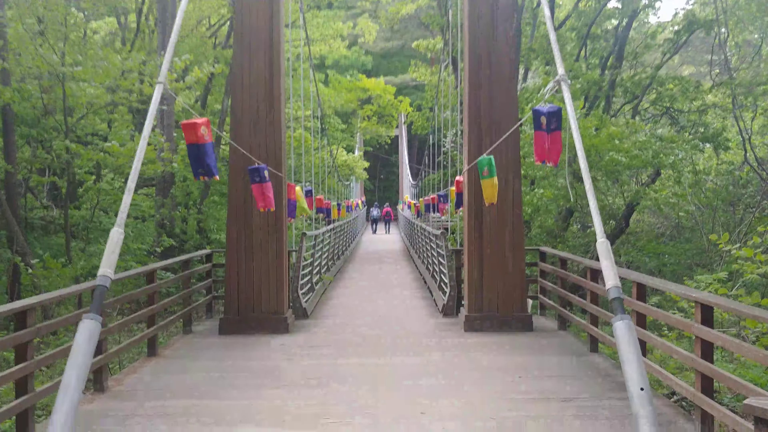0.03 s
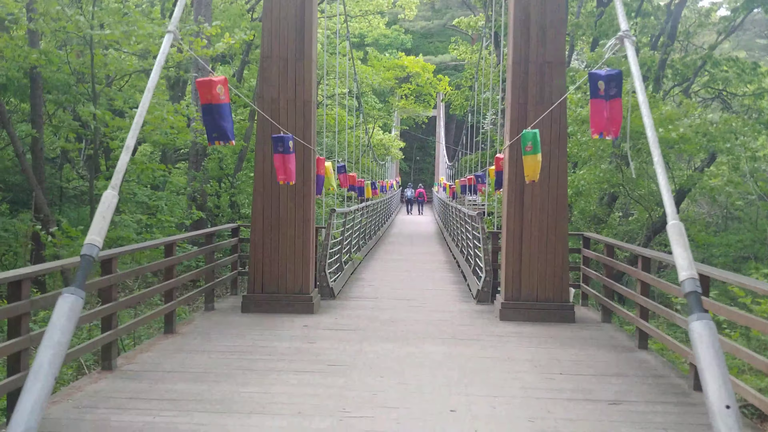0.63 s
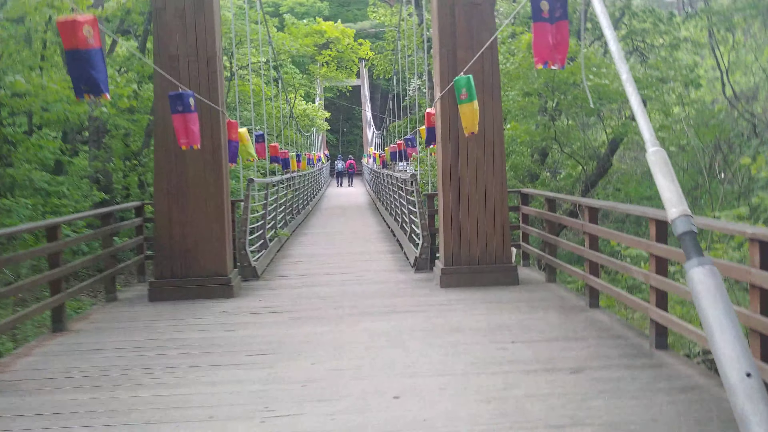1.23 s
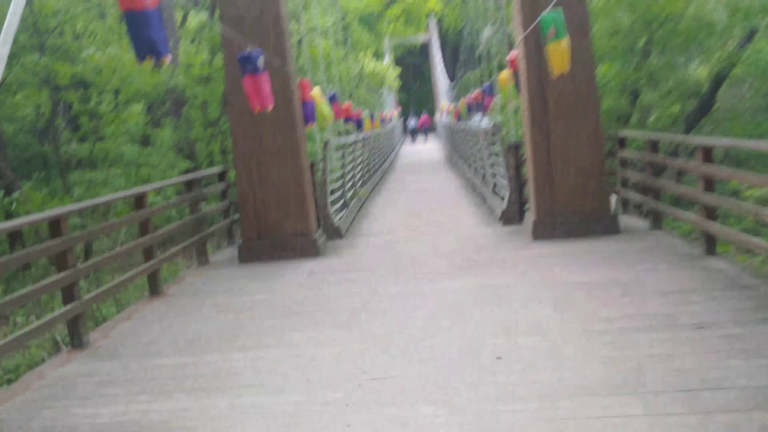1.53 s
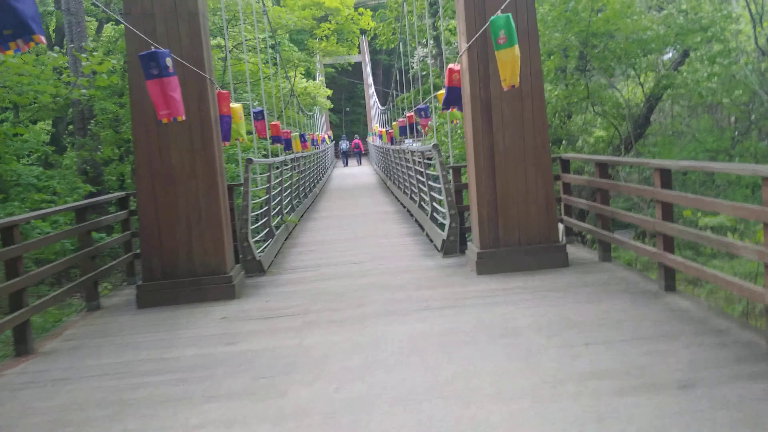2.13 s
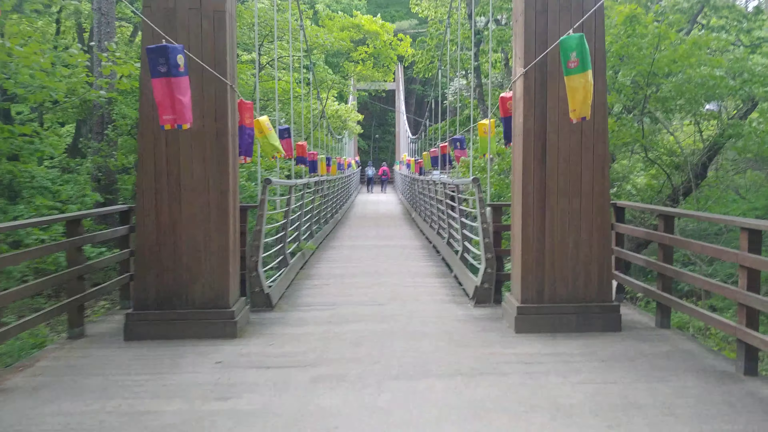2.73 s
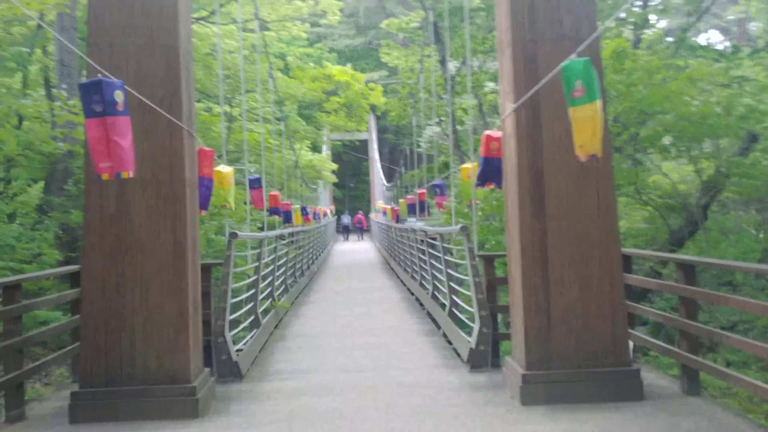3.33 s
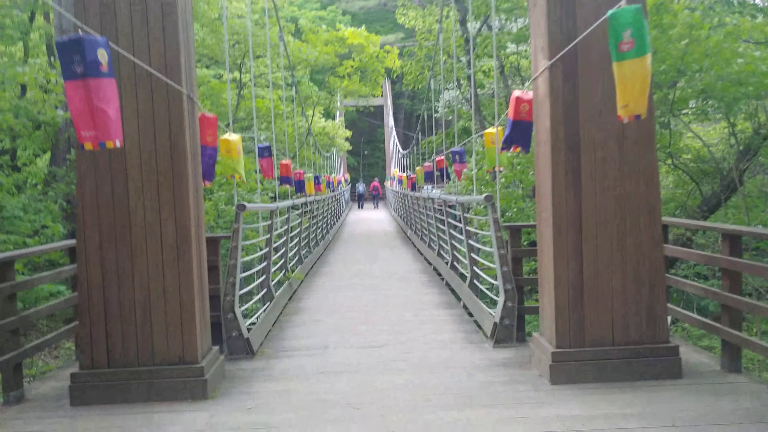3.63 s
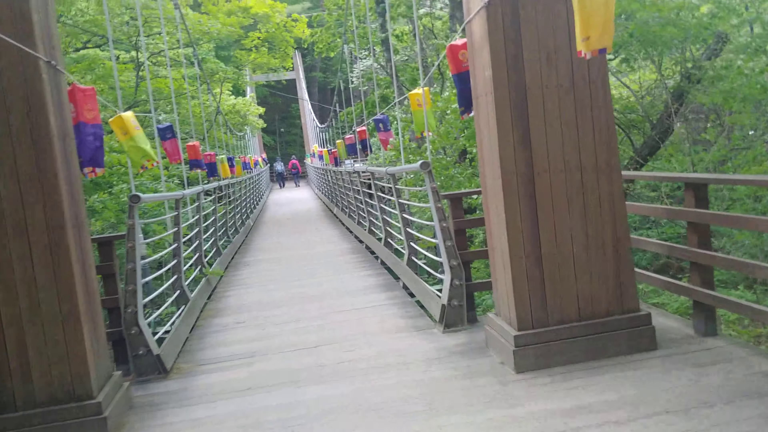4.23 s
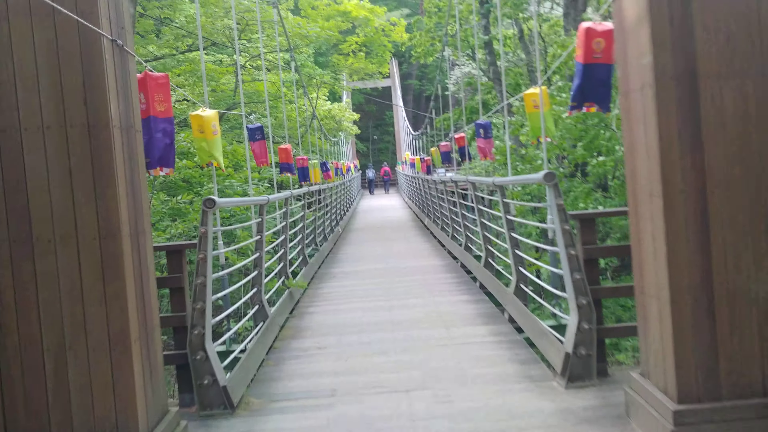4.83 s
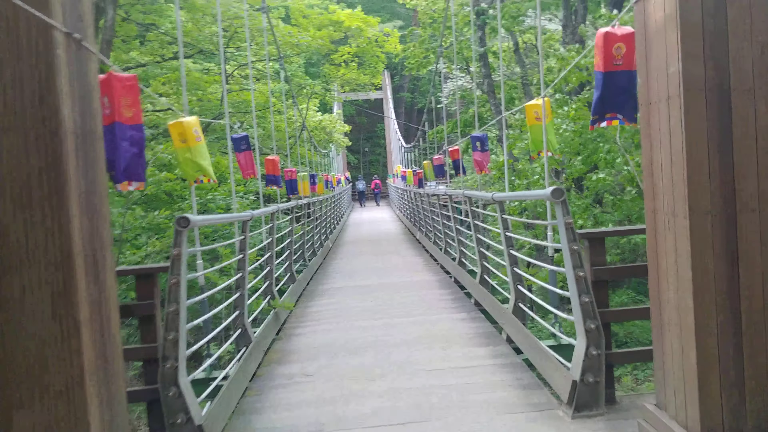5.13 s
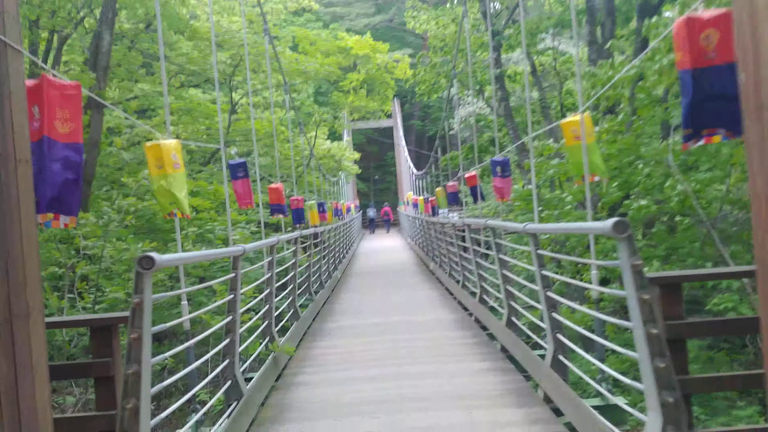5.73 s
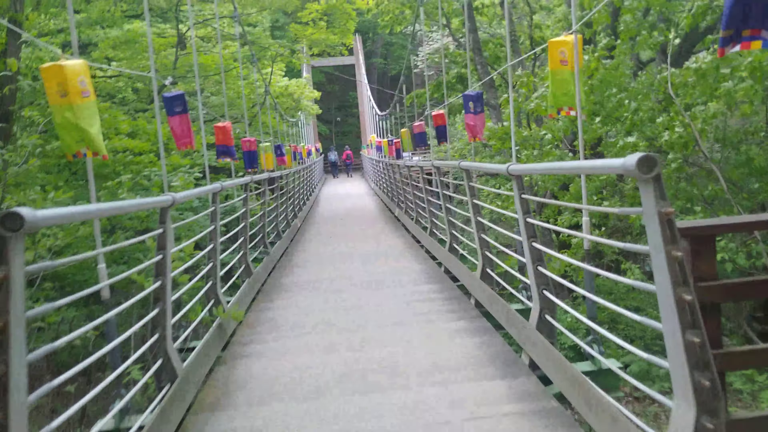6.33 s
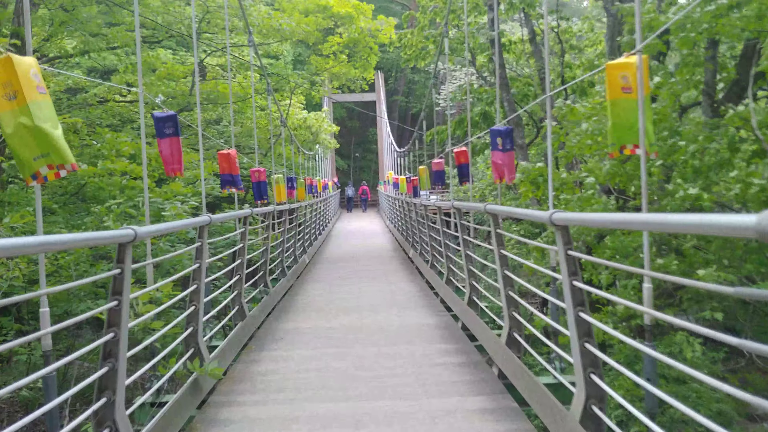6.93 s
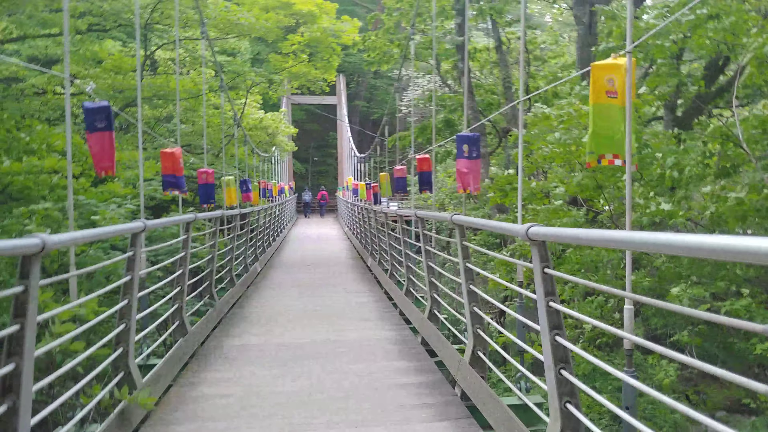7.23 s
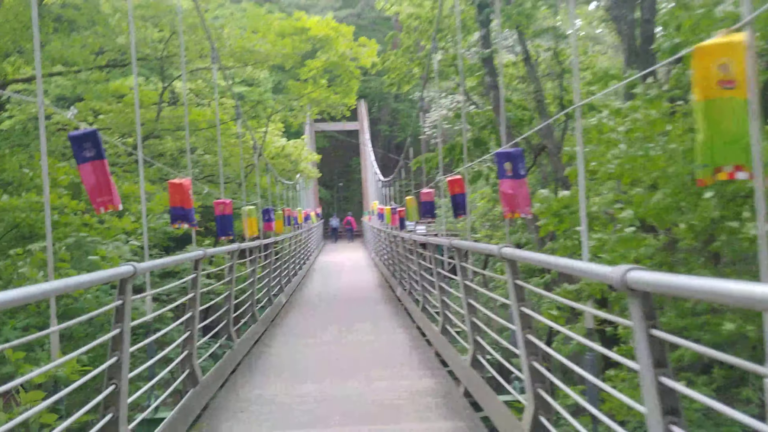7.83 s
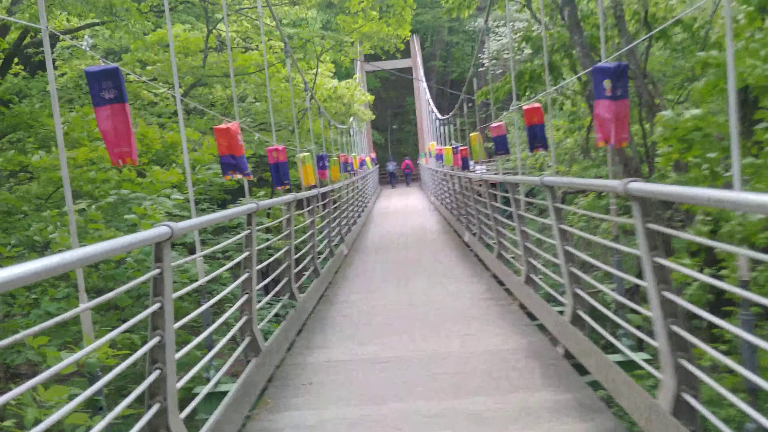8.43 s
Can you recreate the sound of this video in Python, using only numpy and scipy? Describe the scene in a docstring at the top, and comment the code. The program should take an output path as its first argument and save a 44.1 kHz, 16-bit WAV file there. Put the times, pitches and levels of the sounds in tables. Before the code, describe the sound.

A stream and wind in the leaves make a soft, even rush throughout, heard from a microphone in a walker's hand on a wooden footbridge. Close footsteps come about twice a second, with a thin, short echo. One shoe slaps down hard at about 0.3, 2.3, 3.4, 4.4, 5.5, 6.6 and 7.7 seconds, loudest in the middle of the walk. The other lands more softly in between, and the deck gives a dull thump under each step. Gritty scuffs and bright ticks of cracking sand cluster around 1.6 to 1.8 seconds and return near 5.5, 6 and 6.7 seconds. Some steps carry a very brief squeak from a board or rubber sole. At about 4.2 seconds a far bird gives one faint, thin peep. From around 6 seconds the rush grows slightly, and the last soft step falls at about 8.2 seconds.

```python
"""A walk over a wooden footbridge in a wood, heard from a phone in the walker's hand.
From the start, a stream below and wind in the leaves make a steady rush. One shoe slaps down hard
and scuffs, then the other lands softly. As the walk goes on, the deck thumps under each step,
sand cracks and some steps squeak. Halfway through, a far bird peeps once.
Near the end, the rush grows towards the open span."""
import sys
import numpy as np
from scipy import signal
from scipy.fft import rfft, irfft, next_fast_len
from scipy.io import wavfile
from scipy.ndimage import uniform_filter1d, map_coordinates

SR = 44100
rng = np.random.default_rng(int(sys.argv[2]) if len(sys.argv) > 2 else 0)


def unload_audio(sound):
    """Save the sound as a 16-bit wav file, at the path given as the first command line argument."""
    columns = np.transpose(np.atleast_2d(sound))
    # keep every value between -1 and 1, then stretch to whole-number steps
    steps = np.round(np.clip(columns, -1, 1) * 32767)
    wavfile.write(sys.argv[1], SR, steps.astype(np.int16))


N = 374409


def amp(db):
    """Turn decibels into a number to multiply by."""
    return 10 ** (np.asarray(db) / 20)


def unit(x):
    """Scale x so that its average strength (rms) is 1."""
    return x / np.sqrt(np.mean(x ** 2) + 1e-20)


def along(points, hz):
    """Read between the rows of a (pitch_hz, value) table, with octaves evenly spaced."""
    pitches, values = np.transpose(points)
    return np.interp(np.log(hz + 1), np.log(pitches + 1), values)


def wobble(per_s, size):
    """A smooth curve through per_s random values a second."""
    values = rng.standard_normal(int(size * per_s / SR) + 4)
    return map_coordinates(values, [np.arange(size) * per_s / SR])


def filtered(x, response):
    """Turn each frequency in x up or down by response(hz)."""
    size = next_fast_len(len(x) + SR // 4)
    return irfft(rfft(x, size) * response(np.fft.rfftfreq(size, 1 / SR)), size)[:len(x)]


def resonance(f, hz, width_hz):
    """How much something that rings at hz moves when shaken at frequency f."""
    return 1j * f * width_hz / (hz * hz - f * f + 1j * f * width_hz)


def click(tone, size=4096):
    """One sharp click of energy 1, coloured by a (pitch_hz, level_db) table."""
    cepstrum = irfft(np.log(amp(along(tone, np.fft.rfftfreq(size, 1 / SR)))))
    # keep the tone, but pack the sound at the start
    cepstrum[1:size // 2] *= 2
    cepstrum[size // 2 + 1:] = 0
    pulse = irfft(np.exp(rfft(cepstrum)))
    return pulse / np.linalg.norm(pulse)


def press(t, hold_s, attack_s, release_s):
    """The force of a touch: it rises, holds and lets go."""
    return (1 - np.exp(-t / attack_s)) * np.exp(-np.maximum(t - hold_s, 0) / release_s)


def at_level(x, db, length_s):
    """Give x the energy of a steady sound of that level and length."""
    return x * amp(db) * np.sqrt(length_s * SR) / np.linalg.norm(x)


def add(track, start_s, x):
    """Mix x into the track at start_s."""
    start = max(round(start_s * SR), 0)
    track[start:start + len(x)] += x[:len(track) - start]


# The tone of the stream and leaves: pitch_hz, level_db
RUSH_TONE = [(25, -26), (45, -23), (65, -6), (130, -3.5), (250, -2.5), (400, -6), (650, -2.5), (950, -6),
             (1300, -6), (1950, -3.5), (2900, -10), (4400, -16.5), (5900, -19), (7900, -13.5),
             (9500, -25.5), (12000, -38.5), (15500, -39.5)]
# How the rush grows towards the open span: time_s, level_db
RUSH_GROWTH = [(0.0, -42.5), (5.44, -41), (5.65, -40.5), (6.24, -41), (8.49, -38.5)]

def stream_and_leaves(patchy_db=0.9, split_hz=900, low_db=-5.0, high_db=-0.19):
    """Far water and leaves blend into a soft, slightly patchy rush."""
    spectrum = signal.stft(rng.standard_normal(N), nperseg=512)[2]
    patches = uniform_filter1d(rng.standard_normal(spectrum.shape), size=5, axis=0)
    patches = uniform_filter1d(patches, size=10, axis=1)
    noise = signal.istft(spectrum * amp(patchy_db * unit(patches)), nperseg=512)[1][:N]
    low = unit(filtered(noise, lambda hz: amp(along(RUSH_TONE, hz)) * (hz < split_hz)))
    high = unit(filtered(noise, lambda hz: amp(along(RUSH_TONE, hz)) * (hz >= split_hz)))
    growth_db = np.interp(np.arange(N) / SR, *np.transpose(RUSH_GROWTH))
    # the low part swells a little; the hiss stays smooth
    low *= amp(growth_db + low_db + 1.3 * wobble(6.7, N))
    high *= amp(growth_db + high_db + 0.17 * wobble(4.7, N))
    return low + high


def bird(start_s=4.175, length_s=0.048, pitch_hz=2440, level_db=-44.5, waver=0.0084):
    """A far bird gives one thin, slightly wavering peep."""
    out, size = np.zeros(N), int(length_s * SR)
    pitch = pitch_hz * (1 + waver * wobble(90, size))
    peep = np.hanning(size) * np.sin(2 * np.pi * np.cumsum(pitch) / SR)
    add(out, start_s, amp(level_db) * unit(peep))
    return out


# How long the echo takes to fade by 60 dB: pitch_hz, fade_s
ECHO_FADES = [(150, 0.74), (600, 0.38), (2000, 0.26), (6000, 0.39), (14000, 0.43)]

def echo(x, delay_s=0.009):
    """Towers, rails and trees send back a thin echo; each pitch dies at its own speed."""
    hz, t, spectrum = signal.stft(rng.standard_normal(SR // 2), SR, nperseg=256)
    fade = amp(-60 * t / along(ECHO_FADES, hz)[:, None])
    tail = signal.istft(spectrum * fade, SR, nperseg=256)[1]
    tail = np.pad(tail / np.linalg.norm(tail), (int(delay_s * SR), 0))
    return signal.fftconvolve(x, tail)[:N]


# The tone of a cracking sand grain: pitch_hz, level_db
GRAIN_TONE = [(1500, -32), (4000, -16), (6200, -8), (8500, 2), (11000, 6), (15500, -6)]
# Grains cracking under the sole: start_s, peak_db
SAND_CRACKS = [(1.6126, -41), (1.704, -35), (1.8476, -36), (3.0998, -43), (3.7573, -42), (4.8682, -38),
               (5.5462, -32), (5.9957, -36), (6.6627, -32)]

def sand(fade_s=0.043, spiky_db=4, strays_per_s=1.2, stray_db=-49):
    """Each crushed grain gives a bright, crumbling tick; fainter strays crack at random."""
    out, t = np.zeros(N), np.arange(SR // 10) / SR
    grain = click(GRAIN_TONE)
    stray_times = rng.uniform(0, N / SR, round(strays_per_s * N / SR))
    for start_s, peak_db in SAND_CRACKS + [(s, stray_db) for s in stray_times]:
        crumble = rng.standard_normal(len(t)) * amp(spiky_db * wobble(1230, len(t)) - 60 * t / fade_s)
        tick = signal.fftconvolve(crumble, grain)
        add(out, start_s, amp(peak_db) * tick / np.abs(tick).max())
    return out


def note(length_s, pitch_hz, width_hz, level_db):
    """A pressed board or sole sounds one short note; width_hz sets how unsteady it is."""
    t = np.arange(SR // 6) / SR
    pitch = pitch_hz + 0.45 * width_hz * wobble(2 * width_hz, len(t))
    force = press(t, length_s, attack_s=0.00084, release_s=0.0076)
    return at_level(force * np.sin(2 * np.pi * np.cumsum(pitch) / SR), level_db, length_s)


# Notes from boards and rubber: start_s, length_s, pitch_hz, width_hz, level_db
SQUEAKS = [(0.277, 0.022, 346, 48, -26), (0.709, 0.012, 145, 40, -36), (1.59, 0.019, 600, 65, -39),
           (1.598, 0.059, 183.6, 25, -38.5), (1.603, 0.014, 2090, 215, -33), (1.69, 0.017, 1020, 90, -32.5),
           (1.703, 0.017, 1950, 220, -31.5), (2.296, 0.035, 573, 70, -31),
           (2.727, 0.0053, 1240, 500, -23.5), (2.797, 0.044, 205, 30, -37), (3.432, 0.0065, 950, 406, -24),
           (5.459, 0.0046, 1443, 220, -21), (5.46, 0.0094, 747, 200, -22.5), (7.70, 0.012, 1800, 200, -36)]

def squeaks():
    """Loose boards and squeaking rubber add a note to some steps."""
    out = np.zeros(N)
    for start_s, length_s, pitch_hz, width_hz, level_db in SQUEAKS:
        add(out, start_s, note(length_s, pitch_hz, width_hz, level_db))
    return out


# The dull tone of the bridge deck: pitch_hz, level_db
DECK_TONE = [(25, -53), (45, -17), (65, 4.5), (100, 5), (150, -1), (260, -1.5), (380, -2), (700, -40.5),
             (3000, -67)]

def deck_thump(length_s, level_db, boom_hz=204, boom_db=-2, thud_db=-4):
    """A foot's weight makes the deck thud, and the boards under it boom at their own pitch."""
    t = np.arange(SR // 3) / SR
    body = click(DECK_TONE)
    force = press(t, 0.57 * length_s, attack_s=0.00086, release_s=0.037)
    loads = force * rng.standard_normal((2, len(t)))
    thud, boom = [signal.fftconvolve(load, body)[:len(t)] for load in loads]
    boom = filtered(boom, lambda f: resonance(f, boom_hz, width_hz=65))
    return at_level(thud, level_db + thud_db, length_s) + at_level(boom, level_db + boom_db, length_s)


# The tone of a sole hitting wood: pitch_hz, level_db
SOLE_TONE = [(100, -27.5), (250, -7), (390, -1), (700, -4.5), (1000, -9.5), (1700, 2), (2500, -2.5),
             (3800, -6.5), (5000, -14), (6200, -19.5), (8000, -11), (11500, -27.5), (16000, -31)]
# The notes that ring after a step, plank tones and a thin, longer high ring:
# pitch_hz, level_db, fade_s (time to drop 60 dB)
RING_NOTES = [(348, -6.5, 0.048), (493, -2, 0.058), (692, -12.5, 0.18), (1080, -23, 0.025),
              (1520, -11, 0.037), (1824, 2.5, 0.031), (2060, 8, 0.01), (2530, 1.5, 0.016),
              (3344, -9, 0.058), (3800, -9.5, 0.09), (5050, -14.5, 0.08)]

def shoe_hit(length_s, knock_db, clack_db, grit_db, ring_db=-8):
    """A cluster of tiny impacts knocks the plank (low), clacks the sole (middle), grinds grit (high)."""
    t = np.arange(SR // 6) / SR
    roughness = amp(3 * wobble(1111, len(t)))
    force = roughness * press(t, 0.8 * length_s, attack_s=0.00043, release_s=0.0044)
    # every hit rings with a slightly different tuning and balance
    tuning = 1 + rng.normal(0, 0.0307)
    ring = np.zeros(len(t))
    for hz, db, fade_s in RING_NOTES:
        ring += amp(db + rng.normal(0, 1) - 60 * t / fade_s) * np.sin(2 * np.pi * hz * tuning * t)
    body = amp(ring_db) * ring / np.linalg.norm(ring)
    add(body, 0, click(SOLE_TONE))
    out = np.zeros(len(t))
    bands = [([190, 900], "band", knock_db), ([900, 3500], "band", clack_db), (3500, "high", grit_db)]
    for edges_hz, kind, db in bands:
        band = signal.butter(3, edges_hz, kind, fs=SR, output="sos")
        hit = signal.fftconvolve(force * rng.standard_normal(len(t)), body)[:len(t)]
        out += at_level(signal.sosfilt(band, hit), db, length_s)
    return out


# Brushes of a shoe: start_s, length_s, knock_db, clack_db, grit_db
SHOE_SCUFFS = [(0.528, 0.0029, -58, -32.5, -44), (1.587, 0.006, -32.5, -37, -49),
               (1.601, 0.023, -38, -39.5, -36), (1.686, 0.034, -41.5, -35, -37),
               (2.472, 0.0081, -52, -30.5, -33), (2.695, 0.0054, -31, -32, -40.5),
               (5.523, 0.044, -48, -36.5, -44), (5.992, 0.0065, -62, -31.5, -43),
               (6.48, 0.004, -34, -31, -55), (6.656, 0.033, -40.5, -31, -35.5)]

def scuffs():
    """A shoe brushes the planks between steps, leaning on the deck for longer than it rubs."""
    out = np.zeros(N)
    for start_s, length_s, knock_db, clack_db, grit_db in SHOE_SCUFFS:
        add(out, start_s, shoe_hit(length_s, knock_db, clack_db, grit_db))
        add(out, start_s, deck_thump(1.8 * length_s, knock_db - 5))
    return out


# Soft steps: tap_at_s, tap_length_s, knock_db, clack_db, thump_db, heel_lead_s, heel_db
SOFT_LANDINGS = [(0.849, 0.012, -42, -46, -46, 0.148, -39), (1.361, 0.017, -48, -41, -42, 0.063, -39),
                 (1.842, 0.01, -41, -40, -37.5, 0.12, -44),
                 (2.7256, 0.0066, -25.5, -30, -35.5, 0.045, -37.5),
                 (3.9487, 0.0026, -34, -34, -41.5, 0.1, -40), (4.864, 0.025, -44, -38.5, -38, 0.055, -56),
                 (6.102, 0.0021, -28, -33.5, -44.5, 0.09, -37.5), (7.177, 0.009, -40, -56, -43, 0.088, -50),
                 (8.242, 0.0069, -34, -40, -36, 0.085, -40)]

def soft_steps(load_s=0.034, settle_lag_s=0.078, settle_db=-12):
    """The heel lands dully, the sole taps with one broad note, then the weight settles on the deck."""
    out = np.zeros(N)
    for tap_at_s, length_s, knock_db, clack_db, thump_db, heel_lead_s, heel_db in SOFT_LANDINGS:
        add(out, tap_at_s - heel_lead_s, deck_thump(length_s=0.023, level_db=heel_db, boom_hz=156))
        add(out, tap_at_s, shoe_hit(length_s, knock_db, clack_db, grit_db=clack_db - 17))
        add(out, tap_at_s, note(length_s, pitch_hz=1540, width_hz=530, level_db=clack_db - 0.5))
        add(out, tap_at_s, deck_thump(load_s, thump_db, boom_hz=224))
        add(out, tap_at_s + settle_lag_s, deck_thump(load_s, thump_db + settle_db))
    return out


# Hard steps: start_s, heel_length_s, knock_db, clack_db, grit_db, sole_lag_s, sole_length_s,
# sole_db (compared with the heel), roll_length_s, roll_db, thump_db
HARD_LANDINGS = [(0.275, 0.0063, -22, -20, -28, 0.0083, 0.018, -6.5, 0.022, -35, -42.5),
                 (2.2944, 0.0065, -27, -24.5, -28, 0.011, 0.011, -1, 0.024, -28, -33),
                 (3.43, 0.0025, -18.5, -16.5, -29, 0.019, 0.017, -11, 0.03, -36, -40),
                 (4.3965, 0.0045, -21, -16, -21.5, 0.024, 0.015, -13, 0.076, -37, -36.5),
                 (5.4573, 0.008, -23, -14.7, -19.5, 0.016, 0.008, -12.5, 0.033, -43, -33.5),
                 (6.5808, 0.0051, -33.5, -20.5, -27, 0.0127, 0.0059, 4, 0.036, -31.5, -36.5),
                 (7.698, 0.0044, -27.5, -16.5, -25.5, 0.018, 0.0075, -4.5, 0.06, -36, -40)]

def hard_steps(push_lead_s=0.065, roll_gap_s=0.003, catches=3, settle_lag_s=0.095, settle_db=-12):
    """The heel strikes, the sole slaps down, the shoe rolls on and the weight settles on the deck."""
    out = np.zeros(N)
    for (start_s, heel_s, knock_db, clack_db, grit_db,
         sole_lag_s, sole_s, sole_db, roll_s, roll_db, thump_db) in HARD_LANDINGS:
        # the other foot pushes off first
        add(out, start_s - push_lead_s, deck_thump(length_s=0.028, level_db=-47.5, boom_hz=156))
        add(out, start_s, shoe_hit(heel_s, knock_db, clack_db, grit_db))
        add(out, start_s, deck_thump(length_s=0.073, level_db=thump_db))
        slap = shoe_hit(sole_s, knock_db + sole_db, clack_db + sole_db, grit_db + sole_db)
        add(out, start_s + sole_lag_s, slap)
        # the rolling shoe rubs the plank in ever weaker catches
        roll_at_s = start_s + sole_lag_s + sole_s + roll_gap_s
        catch_s = roll_s / catches
        for k in range(catches):
            db = roll_db - 3.5 * k
            rub = shoe_hit(catch_s, knock_db=db - 7.5, clack_db=db, grit_db=db - 4.5)
            add(out, roll_at_s + k * catch_s, rub)
        add(out, start_s + settle_lag_s, deck_thump(length_s=0.12, level_db=thump_db + settle_db))
    return out


def scene(echo_db=-12):
    """Surroundings and steps reach one microphone, so left and right are alike."""
    background = stream_and_leaves() + bird()
    steps = sand() + squeaks() + scuffs() + soft_steps() + hard_steps()
    mono = background + steps + amp(echo_db) * echo(steps)
    return np.array([mono, mono])


def record(dry, ceiling_db=-1.5, top_hz=15950):
    """The tallest peaks are softly rounded off, and nothing above top_hz is kept."""
    rounded = dry / (1 + np.abs(dry / amp(ceiling_db)) ** 4) ** (1 / 4)
    return np.array([filtered(channel, lambda hz: hz < top_hz) for channel in rounded])


dry = scene()
out = record(dry)
unload_audio(out)
```